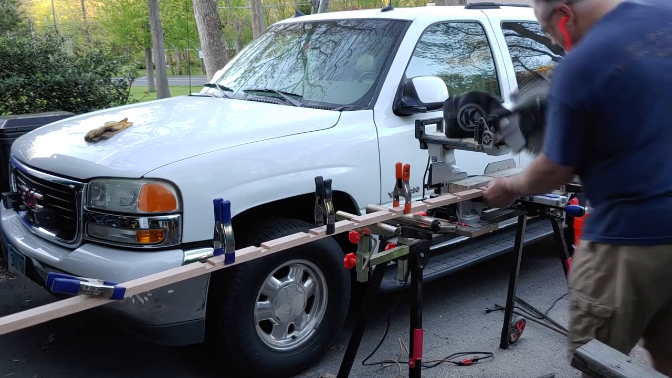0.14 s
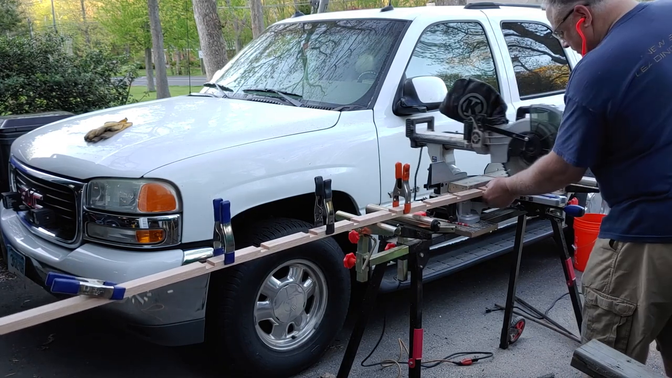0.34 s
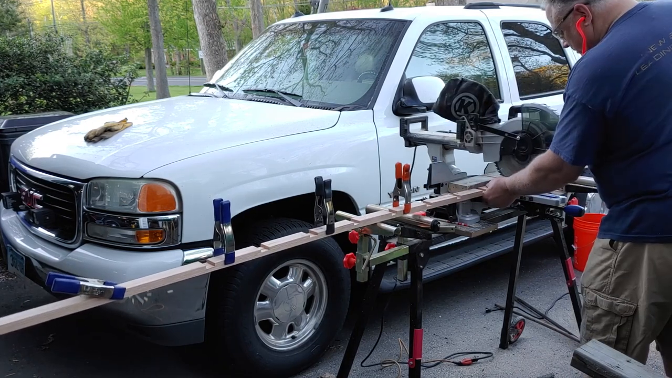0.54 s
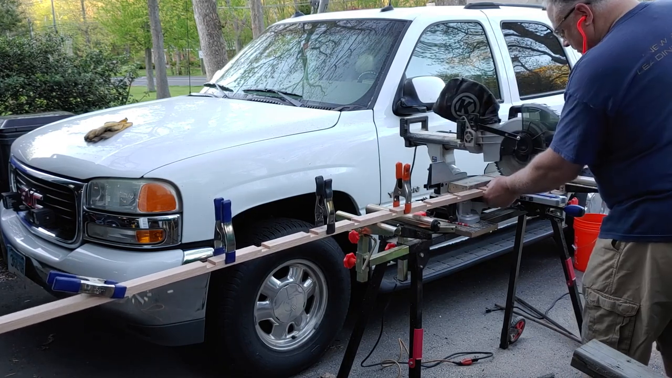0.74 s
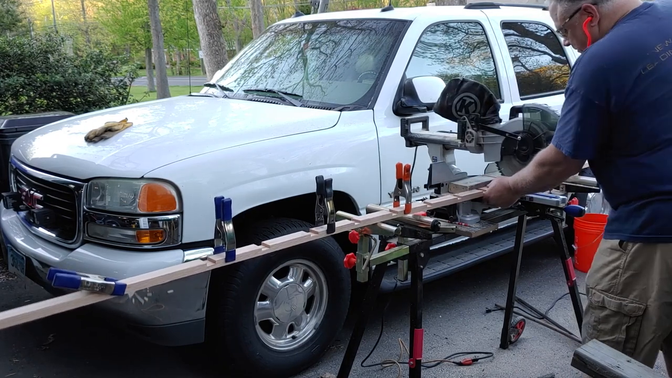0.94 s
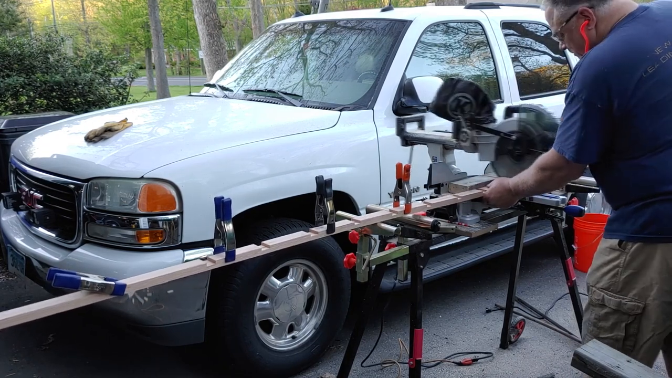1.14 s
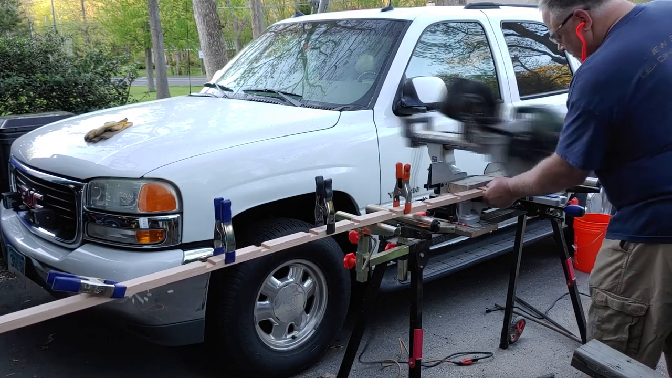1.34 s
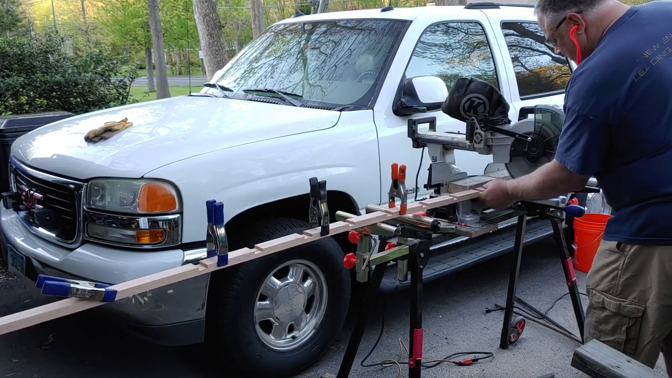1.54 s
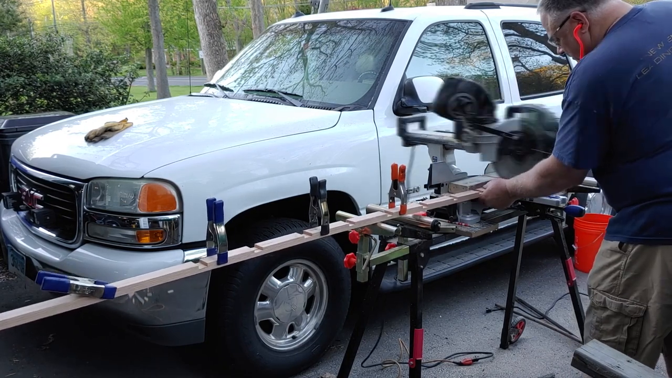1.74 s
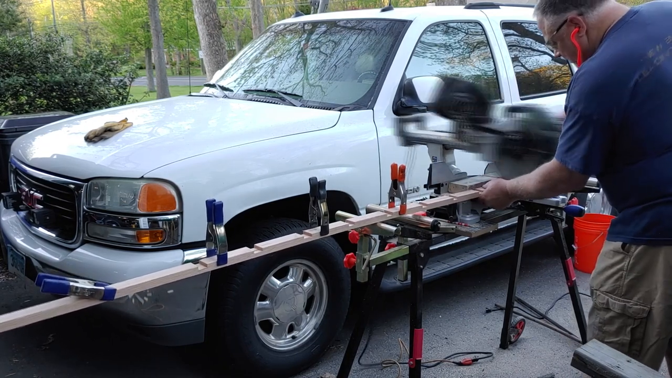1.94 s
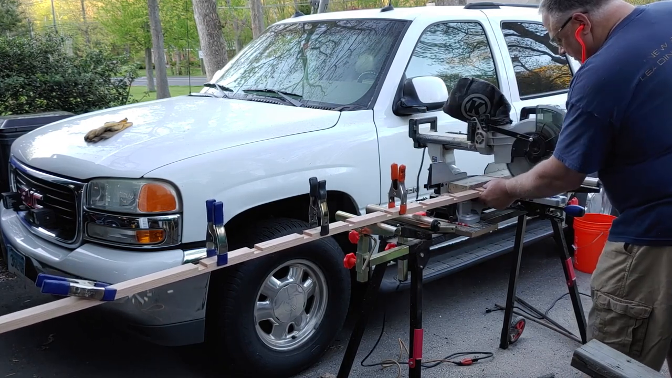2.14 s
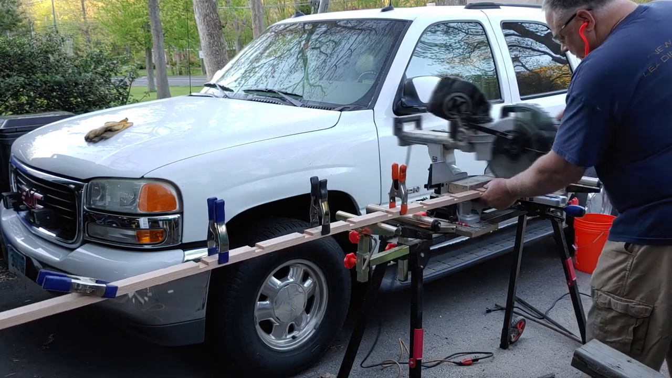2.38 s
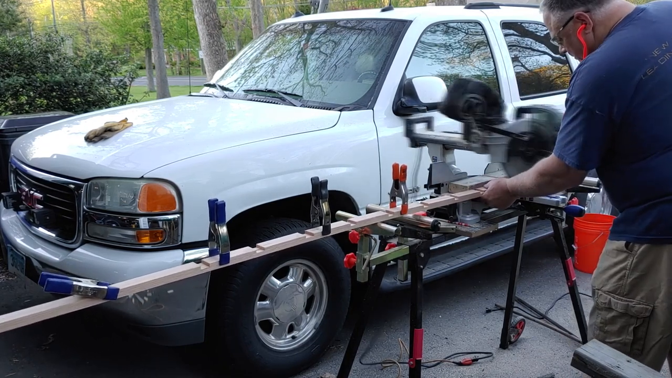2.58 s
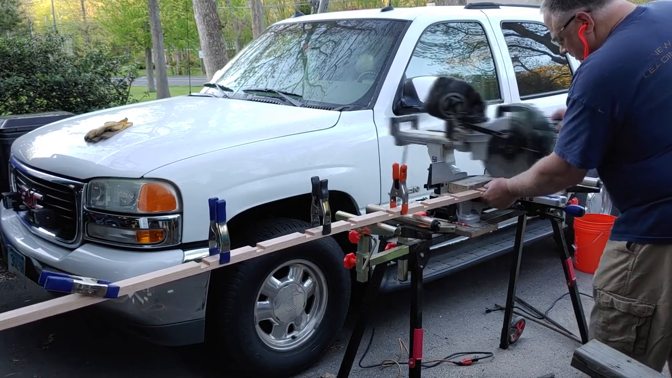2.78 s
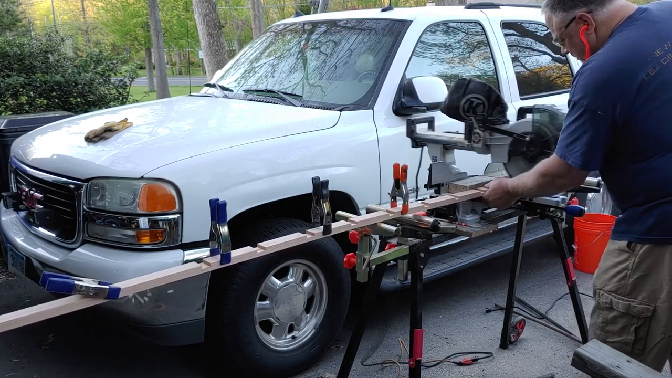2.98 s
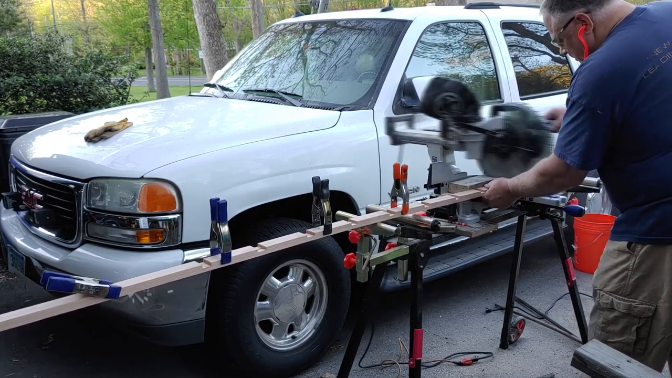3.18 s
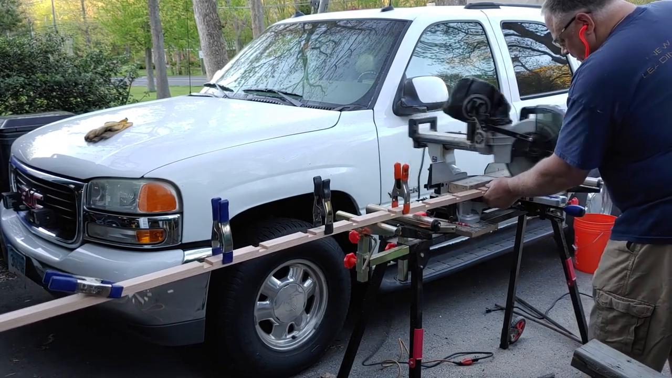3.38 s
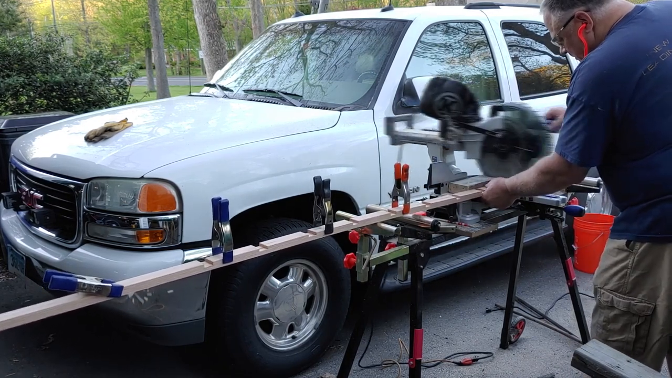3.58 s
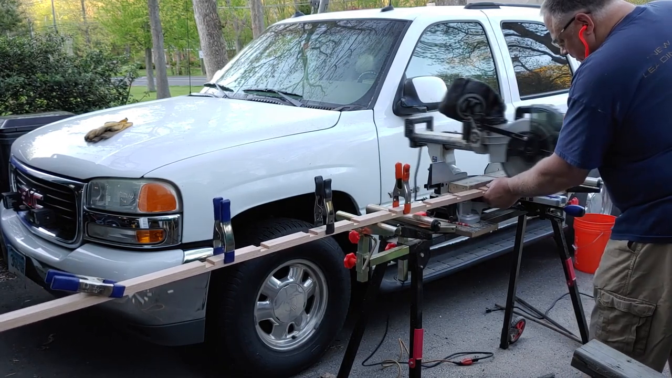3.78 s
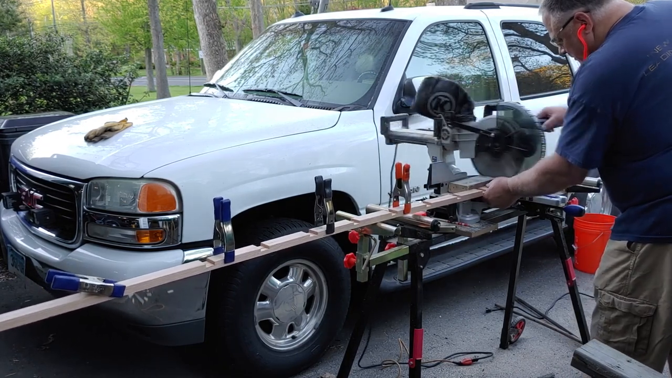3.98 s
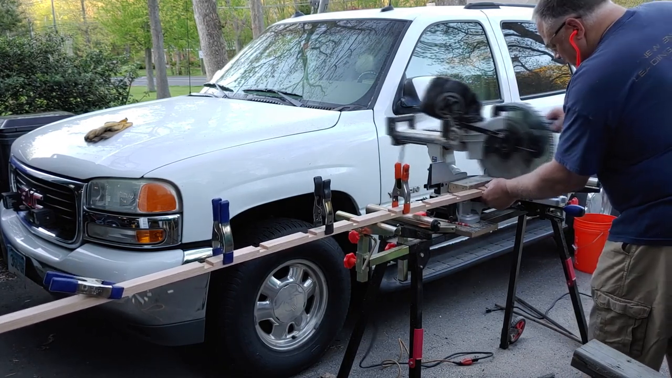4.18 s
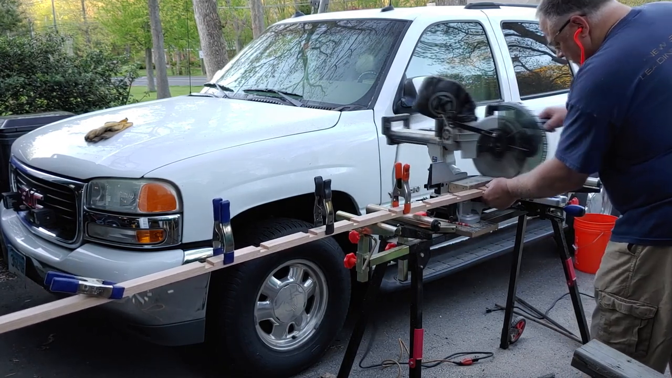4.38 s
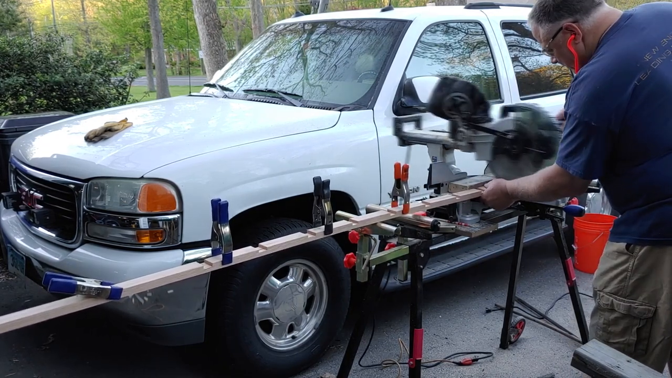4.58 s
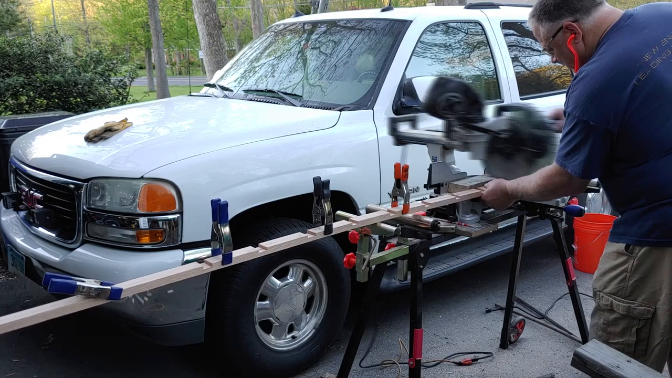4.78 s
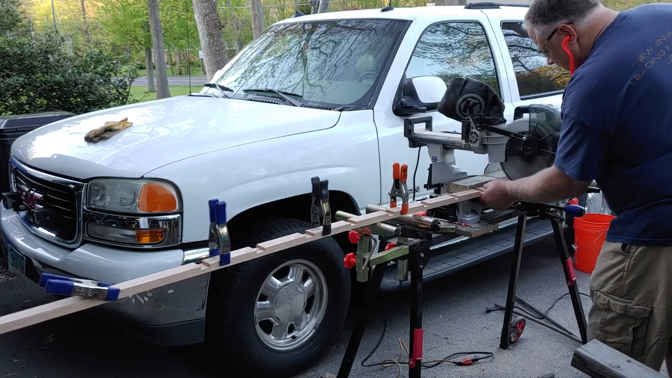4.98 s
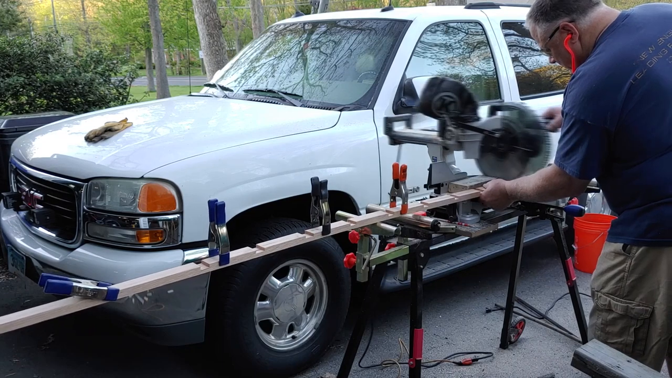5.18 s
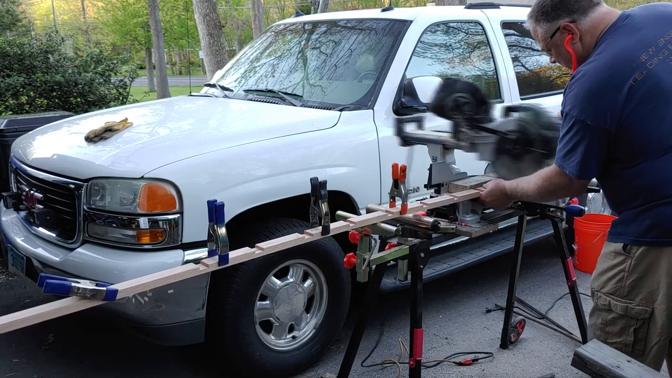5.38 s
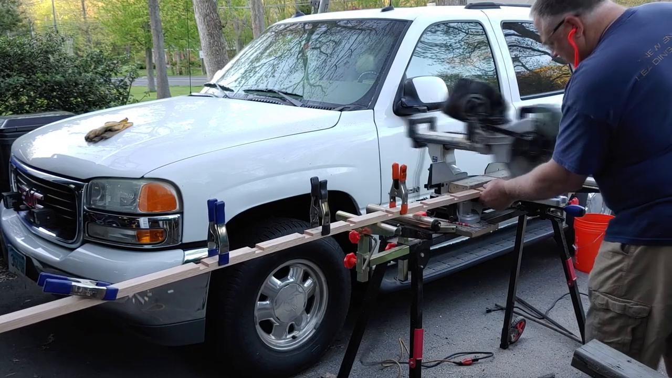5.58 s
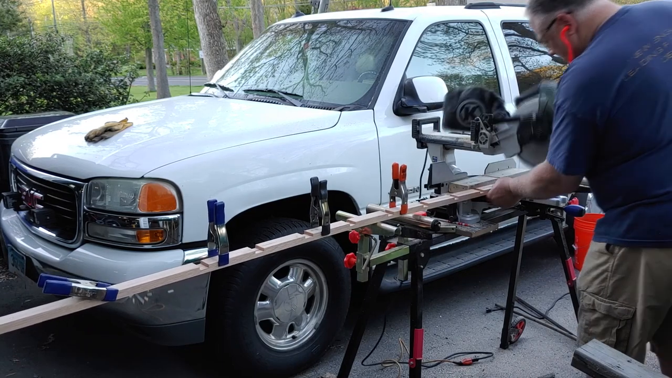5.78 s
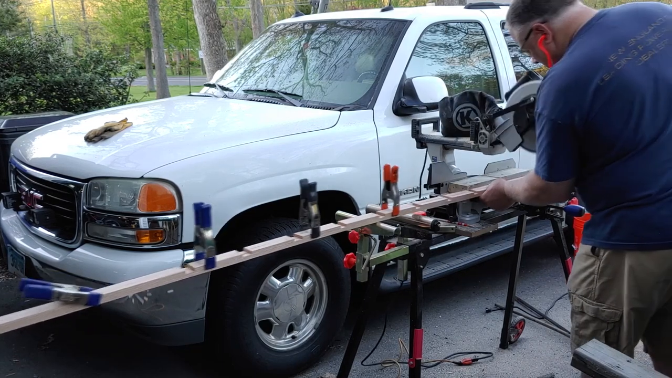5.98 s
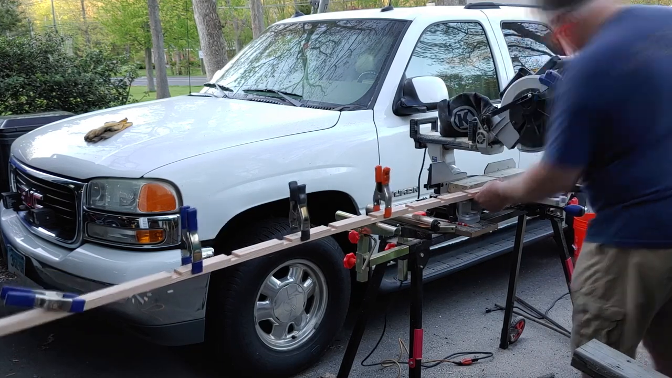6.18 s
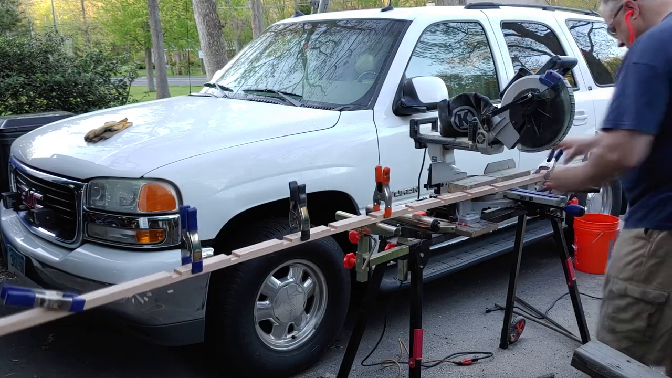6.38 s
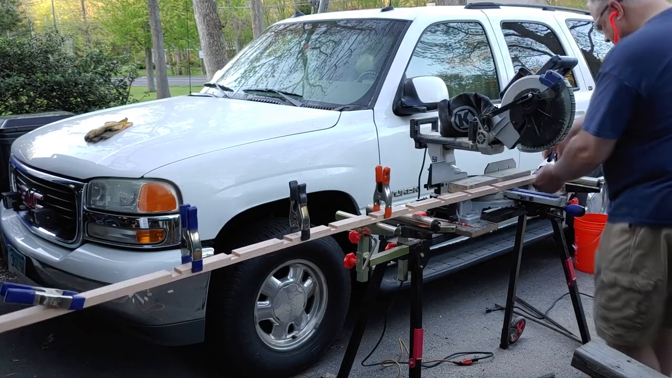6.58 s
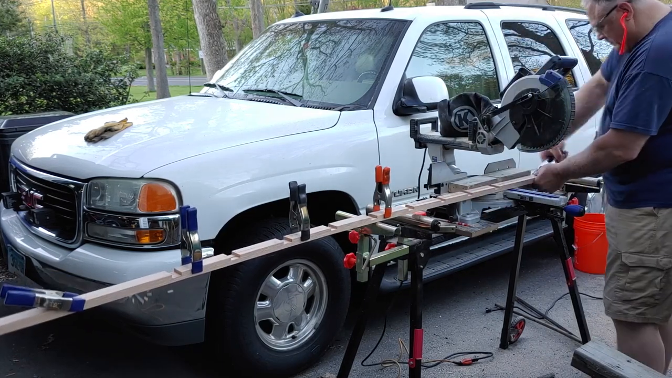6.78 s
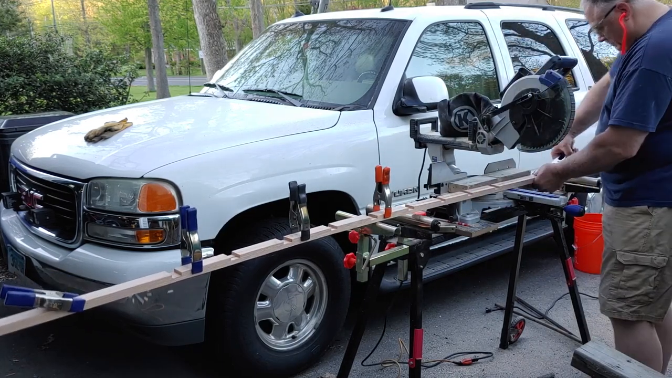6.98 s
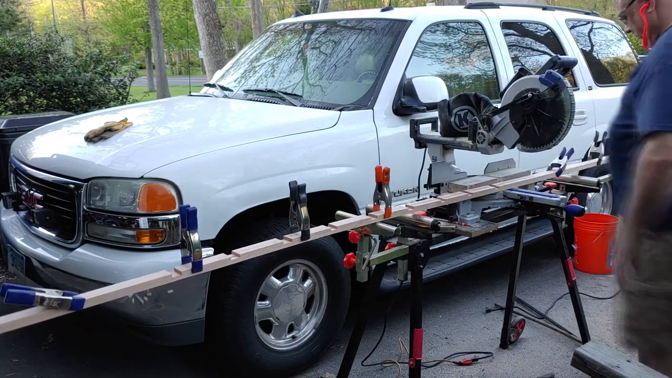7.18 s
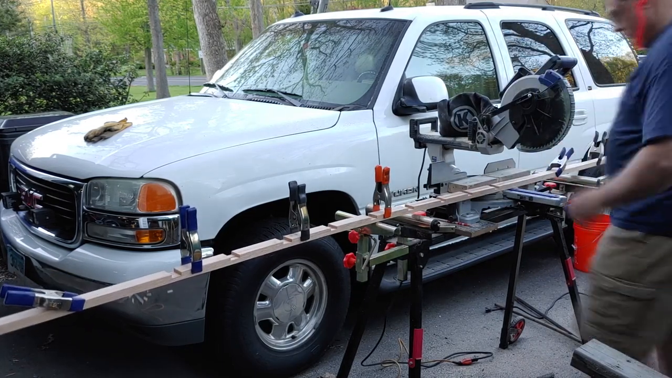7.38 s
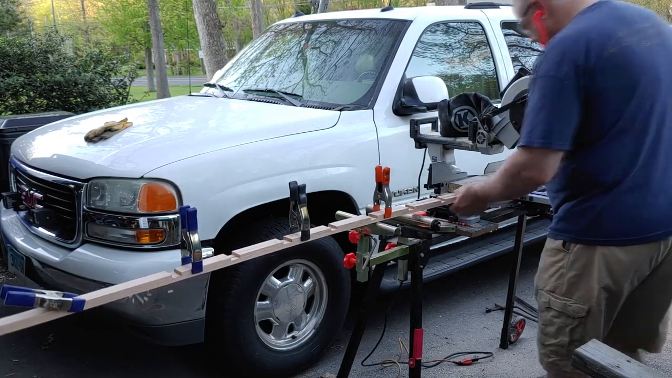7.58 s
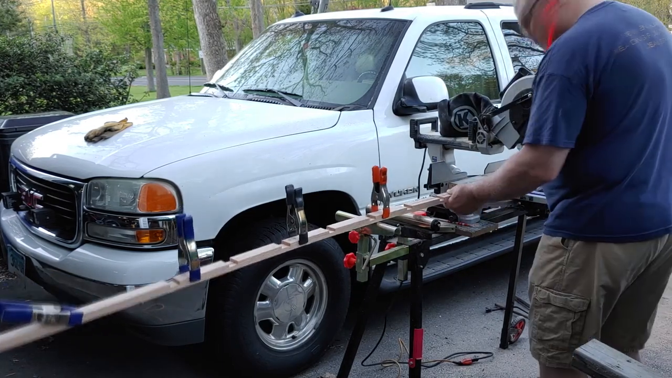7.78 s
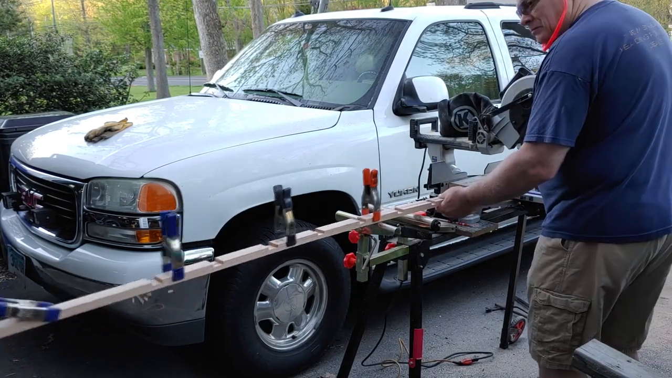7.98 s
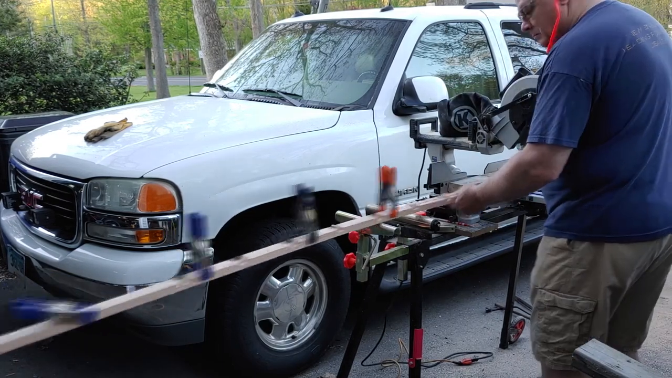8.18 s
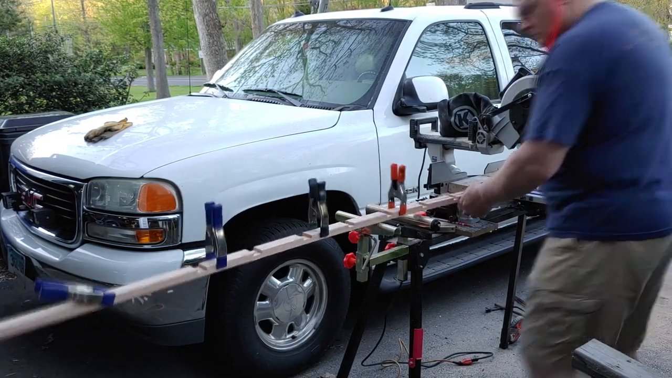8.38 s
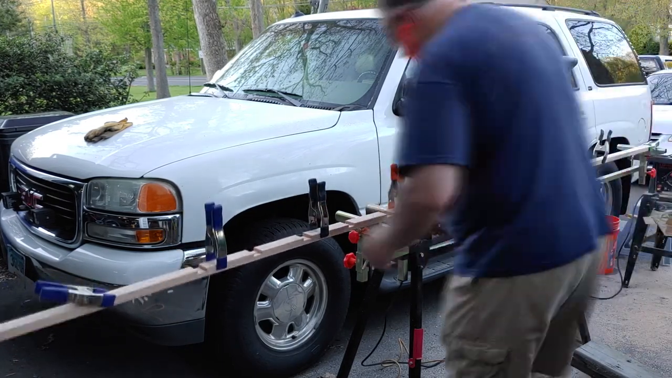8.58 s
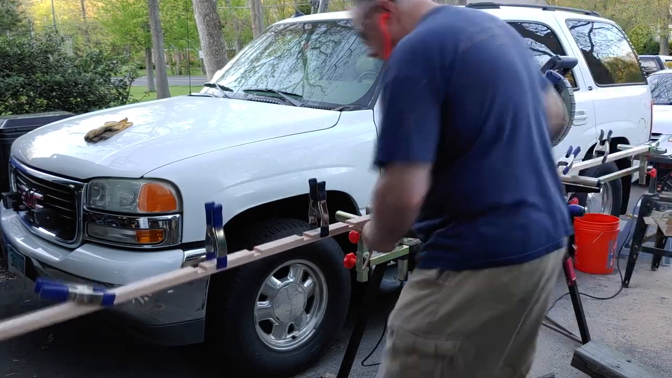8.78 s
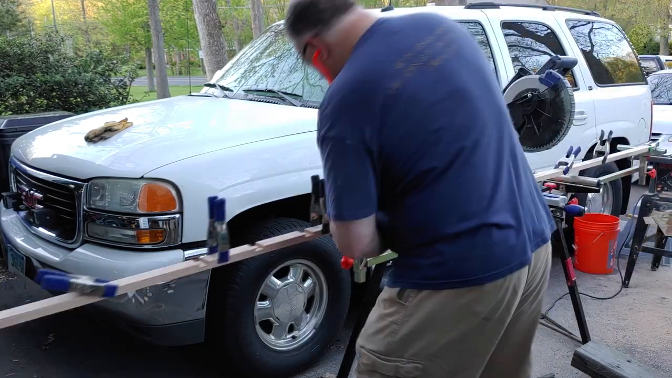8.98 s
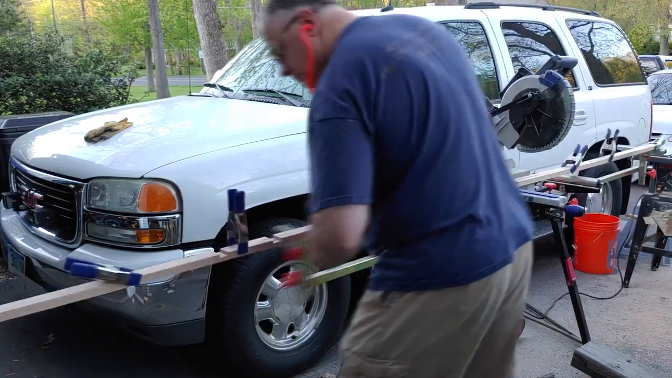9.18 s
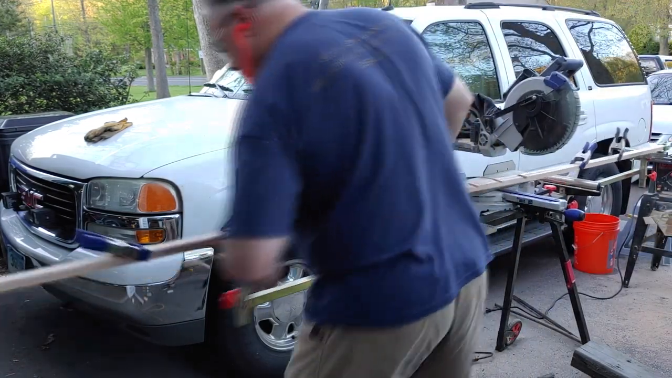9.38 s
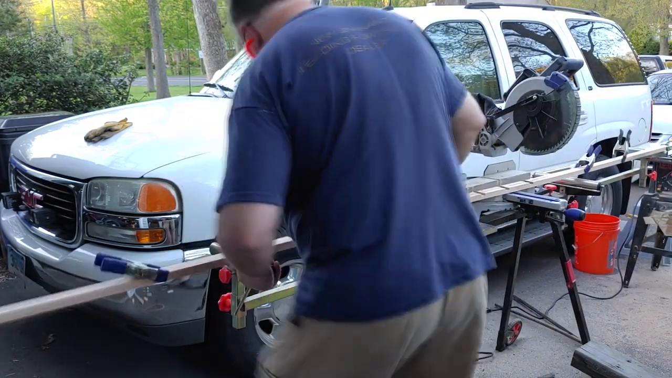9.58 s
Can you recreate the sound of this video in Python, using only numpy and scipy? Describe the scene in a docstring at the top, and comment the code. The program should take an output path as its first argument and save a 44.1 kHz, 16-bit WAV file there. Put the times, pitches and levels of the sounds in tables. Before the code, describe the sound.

Outdoors, a geared saw roars and rasps through a wood strip in repeated short bites, brakes to a ringing coast, and clamped wood clacks over a faint mower drone.

```python
"""On a driveway, a sliding miter saw starts with a clash of gears and nibbles through a clamped wood strip in ten bites.
Running free, its gears rattle as noise through blade resonances; in the wood they fall quieter and the strip rasps.
The brake whines down in falling tones, and the coasting blade rushes and rings from a tap each turn.
A mower drones far off in wavering partials; a shoe thumps, traffic whines and a bird ticks in short glides.
The strip knocks and slides along the fence as bursts of noise and ringing clicks, and a clamp squeaks."""
import sys
import numpy as np
from scipy import signal
from scipy.fft import rfft, irfft, next_fast_len
from scipy.io import wavfile

SR = 44100
rng = np.random.default_rng(int(sys.argv[2]) if len(sys.argv) > 2 else 0)


def store_wav(level_fs):
    """Save 16-bit WAV to argv[1]."""
    pcm = np.round(np.clip(np.atleast_2d(level_fs), -1, 1) * 32767)
    wavfile.write(sys.argv[1], SR, pcm.T.astype(np.int16))


N = 425104
TIME = np.arange(N) / SR
SIZE = next_fast_len(N)
FREQS = np.maximum(np.arange(SIZE // 2 + 1) * SR / SIZE, 1)
CUTOFF_HZ = 15830
SWITCH_ON_S, SWITCH_OFF_S, STOP_S = 1.086, 5.715, 6.47
MAINS_PULSE_HZ = 120   # twice the mains frequency


def from_db(db):
    """Turn decibels into gain."""
    return np.exp(np.asarray(db) * (np.log(10) / 20))


def in_time(rows):
    """Read each column of a curve at every sample."""
    s, *columns = np.transpose(rows)
    return [np.interp(TIME, s, column) for column in columns]


def at_hz(points):
    """Read a spectrum table at every frequency, along a logarithmic pitch scale."""
    hz, value = np.transpose(points)
    return np.interp(np.log(FREQS), np.log(hz), value)


def lift(modes, hz):
    """Power gain of a set of resonances: each raises the sound around its own pitch."""
    gain = 1
    for centre, width, db in modes:
        gain = gain + (from_db(db) ** 2 - 1) / (1 + (2 * (hz - centre) / width) ** 2)
    return gain


def drift(rate):
    """Slow chance: about `rate` random points a second, joined by lines."""
    knots = rng.standard_normal(4096)
    return np.interp(TIME * rate, np.arange(len(knots)), knots)


def step(at_s, rise_s):
    """A smooth change from 0 to 1."""
    return .5 + .5 * np.tanh((TIME - at_s) / rise_s)


def held(start_s, end_s, edge_s):
    """Attack, hold and release."""
    return step(start_s, edge_s) * (1 - step(end_s, edge_s))


def since(at_s):
    """Seconds gone by since a moment, 0 before it."""
    return np.maximum(TIME - at_s, 0)


def phase_of(hz):
    """Running angle of a rotation, in radians."""
    return 2 * np.pi * np.cumsum(hz) / SR


def tone(angle, db):
    """A sine of a given rms level."""
    return np.sqrt(2) * from_db(db) * np.sin(angle)


def ring(clicks, hz, width):
    """A resonance: a unit click sets a sine of height about 1 ringing."""
    r, w = np.exp(-np.pi * width / SR), 2 * np.pi * hz / SR
    return signal.lfilter([0, np.sin(w)], [1, -2 * r * np.cos(w), r * r], clicks + 1e-18)


# How much of the sound comes straight to the microphones: pitch_hz, share (0 to 1)
DIRECT_SHARE = [(60, 0.95), (700, 1), (1400, 0.93), (3000, 0.7), (7000, 0.21), (15000, 0.48)]


def noise(spectrum, modes=(), lag=1.25, band=slice(None), nearness=0.94):
    """Stereo noise through a body: a direct part, `lag` samples later on the left, plus scattered sound."""
    gain = from_db(at_hz(spectrum)) * np.sqrt(lift(modes, FREQS))
    share = np.clip(nearness * at_hz(DIRECT_SHARE), 0, 1)
    white = rfft(rng.standard_normal((3, SIZE)))
    delay = np.exp(-1j * np.pi * FREQS / SR * lag * np.array([[1], [-1]]))
    direct = np.sqrt(share) * white[0] * delay
    scattered = np.sqrt(1 - share) * white[1:]
    both = gain * (direct + scattered) * (FREQS < CUTOFF_HZ)
    # the mix of both sides gets rms 1 within the band
    power = np.sum(np.abs(both.mean(0)[band]) ** 2)
    return irfft(both, SIZE)[:, :N] * SIZE / np.sqrt(2 * power)


def placed(x, lag, scatter_db):
    """A tone arrives `lag` samples later on the left; part of its power comes as dying random echoes."""
    decay = np.exp(-TIME / 0.017)
    echoes = rng.standard_normal((2, N)) * decay / np.sqrt(np.sum(decay ** 2))
    direct = np.exp(-2j * np.pi * FREQS / SR * lag * np.array([[1], [0]]))
    scatter = from_db(scatter_db)
    heard = rfft(x, SIZE) * (direct + scatter * rfft(echoes, SIZE))
    return irfft(heard, SIZE)[:, :N] / np.hypot(1, scatter)


# Pace of the far mower's blade: time_s, passes_per_s (wavers slightly more by chance)
MOWER_RATE = [(0, 96.3), (.7, 95), (1.2, 94.6), (2.7, 95.3), (3.9, 96), (4.5, 97.4), (5.4, 95.4), (6.2, 95),
              (7.3, 96), (8.0, 95.2), (9.2, 96.5), (9.64, 95.7)]
# Fourth partial, which swells and fades over the distance: time_s, level_db (the 16th follows it)
MOWER_FOURTH = [(0, -80), (.7, -64.5), (1.15, -59), (1.3, -73), (1.65, -65), (2.6, -76.5), (3.7, -80),
                (3.95, -69), (4.7, -65), (5.15, -76), (5.4, -63), (7.2, -72), (7.7, -60.5), (8.2, -79),
                (9.64, -76)]
# Eighth partial, likewise: time_s, level_db
MOWER_EIGHTH = [(0, -71), (1.3, -71.5), (5.2, -69), (5.9, -60.5), (6.6, -68.5), (7.4, -62.5), (8.0, -76),
                (8.3, -66), (8.6, -79), (9.64, -67)]
# The other partials: multiple of the blade passes, middle level_db
MOWER_ORDERS = [(2, -89), (3, -87), (5, -71), (6, -72), (7, -79), (9, -77), (10, -87), (11, -86),
                (12, -80.5), (20, -90)]
# A second far hum: middle pitch_hz, middle level_db
FAR_HUM = [(237, -92.5), (356, -77.5), (609, -80)]
# Colour of the outdoor air: pitch_hz, relative level_db (per Hz)
AIR = [(30, -2), (110, -36), (180, -14), (300, -6), (450, 0.5), (800, 1), (1100, -8), (1500, -11.5),
       (3000, -13), (6000, -19), (12000, -23), (15500, -24)]


def mower():
    """Blade-pass partials fade in and out over the distance; the air chopped by the blade throbs with them."""
    angle = phase_of(in_time(MOWER_RATE)[0] * (1 + .001 * drift(12)))
    fourth_db, eighth_db = in_time(MOWER_FOURTH) + in_time(MOWER_EIGHTH)
    partials = [(4, fourth_db), (8, eighth_db), (16, fourth_db - 25)]
    partials += [(k, db + 3 * drift(3.3)) for k, db in MOWER_ORDERS]
    drone = 0
    for k, db in partials:
        # many paths through the trees make the phase wander between the sides
        wander = .5 * drift(3) * np.array([[1], [-1]])
        drone = drone + tone(k * angle + rng.uniform(0, 2 * np.pi) + wander, db)
    drone = drone * (1 + 0.17 * np.cos(phase_of(27.5 + drift(5.3))))   # firing of the engine
    hum = 0
    for hz, db in FAR_HUM:
        hum = hum + tone(phase_of(hz * (1 + .002 * drift(4))), db + 3 * drift(2))
    throb = (1 + 0.14 * np.cos(angle)) * from_db(0.37 * drift(3.9))
    air = from_db(-68.0) * noise(AIR, lag=3.36, nearness=1) * throb
    later_on_left = np.array([np.roll(drone[0], 3), drone[1]])
    return later_on_left + hum + air


# Colour of wood on metal: pitch_hz, relative level_db (per Hz)
CONTACT = [(300, -18), (1400, -3), (2400, 3.5), (4500, 1.5), (7000, 1), (11000, 1.5), (15500, 1)]
# Resonances of the fence: pitch_hz, width_hz, lift_db
FENCE_MODES = [(2360, 110, 3.3), (3220, 120, 1.3), (3740, 80, 2.3), (4290, 140, 1.5), (4870, 87, 1.9),
               (7200, 160, 2.6), (10420, 190, 2.2)]


def wood_on_metal():
    """Rough contact: noise coloured by the resonances of the fence."""
    return noise(CONTACT, FENCE_MODES, lag=1.0)


# Knocks of strip and clamps: start_s, peak level_db (8.5 dB is taken off all), decay_s,
# stressed pitch_hz, its lift_db
KNOCKS = [(0.194, -55, .009, 2300, 12), (0.291, -43, 0.0046, 3530, 14.5), (0.383, -53, 0.0078, 6900, 8),
          (6.5412, -55, .007, 3740, 2), (6.604, -62, .006, 3220, 8), (6.6784, -56.5, .007, 2360, 4),
          (6.795, -61, 0.045, 4800, 1), (7.2519, -60, 0.031, 4800, -1), (7.356, -56, 0.027, 3740, -2),
          (7.6011, -55, .0076, 4800, 2), (7.6799, -54, .0076, 2360, -1), (7.84, -62, .006, 2360, 13),
          (8.238, -63, .02, 3740, 8), (8.3491, -41, 0.0051, 6900, 9), (8.4058, -65, 0.035, 2360, 12),
          (8.689, -45, 0.01, 3220, -1), (8.8967, -55, .007, 3740, 1), (9.1058, -55, .009, 4820, 15),
          (9.1217, -41, 0.0067, 2350, 11.5), (9.2305, -57, .006, 3730, 19), (9.2579, -54, .012, 4920, 17),
          (9.276, -57, .012, 4290, 14), (9.3138, -52, 0.0059, 4290, 14), (9.3462, -56, 0.0076, 2250, 15),
          (9.447, -52, .009, 3770, 5), (9.4739, -50, .007, 4240, 9)]
KNOCK_Q = 12   # sharpness of the stressed pitch


def knocks(contact):
    """Each knock is a short crunch of contact noise that stresses one pitch."""
    blows = np.zeros((2, N))
    for s, db, decay_s, hz, ring_db in KNOCKS:
        span = slice(round(s * SR), round(s * SR) + SR // 4)
        age = TIME[span] - TIME[span][0]
        attack = 1 - np.exp(-age / 0.0016)
        fading = np.exp(-age / decay_s) + 0.13 * np.exp(-age / 0.021)
        crunch = contact[:, span] * attack * fading
        stressed = signal.lfilter(*signal.iirpeak(hz, KNOCK_Q, fs=SR), crunch)
        blows[:, span] += from_db(db - 8.5) * (crunch + (from_db(ring_db) - 1) * stressed)
    return blows


def footstep():
    """A shoe settles on the driveway: a dull thump of low noise that dies quickly."""
    age = since(0.68)
    thump = (1 - np.exp(-age / .003)) * np.exp(-age / .018)
    return from_db(-66) * thump * noise([(60, -11), (250, 0), (900, -25), (3000, -50)])


FULL_TURNS_PER_S, LEAP_SHARE, LEAP_S, CREEP_S = 377, .62, .009, .13
BRAKE_S, COAST_TURNS_PER_S = .1445, 13


def rotor_speed():
    """Turns per second: a leap and a creep up to full speed, then the brake pulls it down to a slow coast."""
    on = since(SWITCH_ON_S)
    leap_left = LEAP_SHARE * np.exp(-on / LEAP_S)
    creep_left = (1 - LEAP_SHARE) * np.exp(-on / CREEP_S)
    driven = FULL_TURNS_PER_S * (1 - leap_left - creep_left)
    return COAST_TURNS_PER_S + (driven - COAST_TURNS_PER_S) * np.exp(-since(SWITCH_OFF_S) / BRAKE_S)


# Blade in the wood: start_s, end_s, rasp level_db of the strip (7 dB is taken off all)
BITES = [(1.217, 1.429, -48.5), (1.832, 2.05, -46.5), (2.445, 2.657, -47.5), (2.82, 3.043, -46),
         (3.207, 3.43, -46), (3.58, 3.804, -48), (3.965, 4.185, -51), (4.228, 4.356, -49.5),
         (4.554, 4.699, -44), (5.193, 5.34, -48.5)]


def in_wood():
    """One 0-to-1 curve for each bite of the blade."""
    return [held(start, end, 0.013) for start, end, _ in BITES]


# reference level of the saw, from which its layers are set
FREE_DB, LOAD_DROP_DB = -35.5, 3.5
CLASH_DB, CLASH_HOLD_S, CLASH_FALL_DB_PER_S = -30.0, 0.023, 170
BRAKE_DROP_DB, COAST_FALL_DB_PER_S = 11.5, 14.5


def saw_level(load):
    """Level in dB: a clash, a roar that dips whenever the gears are taut, and a fall after switch-off."""
    # the gears also stay taut from the start to the end of the first bite
    taut = np.maximum(load, 1 - step(BITES[0][1], .015))
    off = since(SWITCH_OFF_S)
    braked = BRAKE_DROP_DB * (1 - np.exp(-off / BRAKE_S))
    roar = FREE_DB - LOAD_DROP_DB * taut - braked - COAST_FALL_DB_PER_S * off
    clash_db = CLASH_DB - CLASH_FALL_DB_PER_S * since(SWITCH_ON_S + CLASH_HOLD_S)
    return np.maximum(roar, clash_db)


def whirr(angle, order=4):
    """Fan blades and commutator repeat one irregular pattern each turn; the pattern slowly changes."""
    size, top = 2048, 42   # points in a turn, end of the partials
    out = 0
    for _ in range(order):
        partials = np.zeros(size // 2 + 1, complex)
        partials[6:top] = rng.standard_normal(top - 6) + 1j * rng.standard_normal(top - 6)
        turn = irfft(partials)
        place = (angle * size / (2 * np.pi)).astype(int) % size
        out = out + drift(7) * (turn / turn.std())[place]
    return out / np.sqrt(order)


# Buzz of the stalled motor: multiple of twice the mains frequency, level_db
STALL_BUZZ = [(4, -56.5), (8, -58.5), (12, -55), (16, -50), (20, -46), (24, -50), (27, -51), (31, -43)]
# Steady motor tones: multiple of the rotor speed, middle level_db relative to the saw level
MOTOR_ORDERS = [(4, -24.5), (32, -18)]
# Armature slots whining under the brake: multiple of the slot rate, start_s, end_s,
# level_db at switch-off (before the housing), fall_db_per_s
BRAKE_WHINE = [(1, 5.72, 6.125, -47, 15), (2, 5.765, 6.045, -41.5, 53)]
# How well the motor housing radiates the whine: pitch_hz, gain_db
HOUSING = [(1100, -12), (1300, -9), (1550, -3.5), (2000, -1), (2500, 0), (3050, -3), (3700, 14),
           (4150, -0.5), (4600, -13), (5200, -5), (5900, -14), (6800, 7), (7500, 4), (8500, 14), (9600, 3),
           (11300, 2), (13500, -12), (15500, 6)]
# Fan whistle at ten times the rotor speed: time_s, middle level_db
FAN_WHISTLE = [(1.4, -59), (2.2, -49.5), (2.9, -55), (4.3, -47.5), (5.7, -50.5)]


def motor_tones(angle, speed, saw_db, running):
    """A mains buzz at stall, steady orders at speed; the slot whine sweeps through the housing resonances."""
    mains = 2 * np.pi * MAINS_PULSE_HZ * TIME
    buzz = sum(tone(k * mains + 0.53 * drift(80), db) for k, db in STALL_BUZZ)
    buzz = buzz * (1 - step(1.18, 0.048))
    driven = running * (1 - step(SWITCH_OFF_S, .02))
    steady = driven * sum(tone(k * angle, saw_db + db + 2 * drift(5.98)) for k, db in MOTOR_ORDERS)
    steady = steady + running * from_db(saw_db - 11) * whirr(angle)
    # the slots also whine for a moment at the start
    surge = from_db(-50.0) * np.exp(-((TIME - 1.122) / 0.015) ** 2)
    slots = 32
    whine = 0
    for multiple, start, end, db, fall_db_per_s in BRAKE_WHINE:
        hz = multiple * slots * speed
        braking = from_db(db - fall_db_per_s * since(SWITCH_OFF_S)) * held(start, end, 0.0098)
        size = (braking + surge) * from_db(np.interp(hz, *np.transpose(HOUSING)))
        note = tone(multiple * slots * angle + .8 * drift(600), 2.6 * drift(260))
        whine = whine + size * (hz < CUTOFF_HZ) * note
    whistle_db = in_time(FAN_WHISTLE)[0] + 2 * drift(20)
    whistle = driven * tone(10 * angle + .5 * drift(50), whistle_db)
    body = placed(buzz + steady + whine, lag=1.2, scatter_db=-4)
    return body + placed(whistle, lag=1.2, scatter_db=-12)


# Colour of the gears clashing at the start: pitch_hz, relative level_db (per Hz)
CLASH = [(200, -38), (520, -14), (900, -27), (1300, -26), (1800, -7.5), (2600, 4), (3800, 1.5), (4600, -22),
         (8000, -12), (15500, -22)]
# Resonances of blade and guard when rattled: pitch_hz, width_hz, lift_db
RATTLE_MODES = [(1423, 28, 12.5), (1700, 56, 6.5), (1850, 180, 9), (2370, 90, 0), (2640, 67, 5.5),
                (3480, 190, 3.5), (3690, 110, 1.5), (3920, 73, 3), (4170, 135, 5), (5160, 170, 5.5),
                (5970, 67, 2), (6620, 520, 4), (11300, 580, 3.5), (1188, 25, 14.5)]
# Resonances of the coasting blade; the first also colours the clash: pitch_hz, width_hz, lift_db
BLADE_MODES = [(1730, 80, 7), (2710, 75, 14), (3740, 170, 10.5), (5060, 60, 8), (5290, 60, 8),
               (9750, 200, 5), (11700, 250, 8)]


def gear_clash(mids):
    """Gears clash as noise; the starting torque pulses at twice the mains frequency."""
    pulse = np.cos(2 * np.pi * MAINS_PULSE_HZ * TIME)
    return noise(CLASH, BLADE_MODES[:1] + RATTLE_MODES[2:7], band=mids) * (1 + 0.23 * pulse)


# Colour of the saw running free: pitch_hz, relative level_db (per Hz)
FREE = [(60, -25), (180, -35.5), (700, -16.5), (1050, -10.5), (1300, -11), (1600, -8), (2500, 3), (3800, 1),
        (4700, -0.5), (6800, -1), (8000, -2), (10300, -1.5), (11800, 1), (15500, 2)]


def gear_rattle(angle, mids):
    """Loose teeth knock unevenly, about once a turn, and set blade and guard ringing."""
    knocking = 1 + 0.076 * np.cos(angle + 0.64 * drift(200))
    return noise(FREE, RATTLE_MODES, band=mids) * knocking * from_db(0.38 * drift(90))


# Colour of the saw in the wood: pitch_hz, relative level_db (per Hz)
BITING = [(60, -32.5), (180, -33), (700, -23.5), (1200, -11), (1700, -5), (3000, -1.5), (3800, 0),
          (4600, -2), (6000, -4.5), (7000, -2.5), (8000, -4), (10000, -1.5), (12000, -3), (15500, -0.5)]


def blade_biting(mids):
    """In the wood the saw is an uneven noise with a single rattle resonance."""
    return noise(BITING, RATTLE_MODES[6:7], band=mids) * from_db(0.62 * drift(120))


def strip_rasp(bites):
    """The strip is a dull soundboard for the teeth that tear it."""
    board = [(40, -32.0), (120, -20.5), (250, -10.5), (600, 1.0), (1000, 3.0), (1600, -1.5), (4000, -39)]
    wood = noise(board, nearness=0.13) * from_db(1.0 * drift(40))
    return wood * sum(bite * from_db(row[2] - 7.0) for bite, row in zip(bites, BITES))


# Colour of the zing: pitch_hz, relative level_db (per Hz)
ZING = [(2000, -25), (4500, -8), (7000, -3), (12000, -1), (15500, -1)]
ZING_DB, ZING_S = -4.5, 0.052   # relative to the free rattle, decay


def exit_zing():
    """The teeth zing as the blade leaves the wood: a bright burst of noise that dies away."""
    bursts = sum(step(end, .006) * np.exp(-since(end) / ZING_S) for _, end, _ in BITES)
    return noise(ZING) * bursts * from_db(ZING_DB)


SHIMMER_WIDTH_HZ, SHIMMER_DB, SHIMMER_PER_S = 85, 2.2, 48


def shimmer(x, count=10):
    """The blade's crowded modes trade energy: narrow bands, dealt into groups, flare and fade on their own."""
    group = rng.integers(0, count, SR)[(FREQS / SHIMMER_WIDTH_HZ).astype(int)]
    spectrum = rfft(x, SIZE)
    gains = [from_db(SHIMMER_DB * drift(SHIMMER_PER_S)) for _ in range(count)]
    out = sum(gain * irfft(spectrum * (group == k), SIZE)[:, :N] for k, gain in enumerate(gains))
    return out / np.sqrt(sum(gain ** 2 for gain in gains) / count)


# Echoes of the moving head: middle delay_s, change of delay_s, gain relative to the direct sound
HEAD_ECHOES = [(.0013, .00005, .22), (.0047, .00005, .3)]


def moving_head(x):
    """The head slides to and fro, so the echoes from table and truck comb the sound at shifting pitches."""
    out, power, samples = x.copy(), 1, np.arange(N)
    for delay_s, travel_s, size in HEAD_ECHOES:
        at = samples - SR * (delay_s + travel_s * drift(5))
        out += size * np.array([np.interp(np.round(at), samples, side) for side in x])
        power += size ** 2
    return out / np.sqrt(power)


# Tones of the blade plate: middle pitch_hz, level_db running free, level_db in the wood
# (3.5 dB is taken off both, and chance moves them)
BLADE_TONES = [(1498, -63, -68), (2397, -57, -65), (2874, -55, -64), (3265, -52.5, -59), (3980, -57, -56),
               (5370, -59, -60), (7140, -59, -56), (8812, -61, -58), (11330, -55, -66), (12025, -49, -60),
               (12890, -56, -61), (13950, -55, -60), (14125, -55, -58), (14988, -56, -62)]
# Its loudest squeals, and brief flares of the fan whistle at ten times the rotor speed (the rows at 3400 to
# 3761 Hz): # middle time_s, pitch_hz, level_db, swell_s, glide_hz_per_s
SQUEALS = [(1.255, 3400, -42, .03, 1500), (1.32, 3505, -48, .045, 600), (1.44, 5340, -44, .03, 0),
           (1.45, 7130, -45, .03, 600), (2.05, 5196, -41, .03, 0), (2.65, 9532, -44, .03, 0),
           (3.825, 12891, -43, .025, 0), (4.0, 6750, -44, .03, -1200), (4.14, 9532, -43, .03, 0),
           (4.22, 3761, -42, .02, 0), (4.0, 3990, -45, .025, -1500), (4.58, 3761, -38, .03, -1100),
           (5.26, 3761, -43, .03, -900)]


def blade_song(running, load):
    """Plate modes of the blade swell and fade by chance, and squeal in short glides when the kerf rubs them;
    the fan whistle flares and glides in the same way."""
    song = np.zeros(N)
    for hz, free_db, wood_db in BLADE_TONES:
        swell_db = 5.0 * np.minimum(drift(14), 1.5)
        level_db = free_db + load * (wood_db - free_db) - 3.5 + swell_db
        song += tone(phase_of(hz + 14 * drift(60) + 12 * drift(9)), level_db)
    song *= running
    waver = phase_of(10 * drift(82))
    for s, hz, db, swell_s, glide_hz_per_s in SQUEALS:
        near = np.abs(TIME - s) < 3 * swell_s
        t = TIME[near] - s
        glide = phase_of(hz + glide_hz_per_s * t)
        song[near] += tone(glide + waver[near], db) * np.exp(-(t / swell_s) ** 2)
    return placed(song, lag=1.2, scatter_db=-4)


# Colour of the coasting rush: pitch_hz, relative level_db (per Hz)
COASTING = [(400, -44), (1300, -12.5), (1800, -6), (2300, -11), (3100, -17), (3700, -10.5), (4500, -17.5),
            (6000, -17.5), (9800, -14), (13000, -22.5), (15500, -17)]
# Blade modes that the taps ring: pitch_hz, width_hz, relative level_db
TAPPED_MODES = [(1725, 42, -5), (2710, 40, -9), (3760, 50, 0), (3640, 60, -7), (5270, 50, -18)]
RUSH_DB, RUSH_TREBLE_DB, RUSH_TREBLE_FALL_DB_PER_S, RUSH_SPLIT_HZ = -1.5, 9.5, 22.5, 6500
TAP_DB, TAP_SPREAD_DB = -3.5, 3.0


def coast(angle, mids):
    """A rush whose treble dies faster, and a tap of the slack gear each turn that makes the modes flutter."""
    rush = noise(COASTING, BLADE_MODES, band=mids) * from_db(RUSH_DB + 1.4 * drift(46))
    dull = signal.sosfilt(signal.butter(4, RUSH_SPLIT_HZ, fs=SR, output="sos"), rush)
    bright = signal.sosfilt(signal.butter(4, RUSH_SPLIT_HZ, "high", fs=SR, output="sos"), rush)
    treble_db = RUSH_TREBLE_DB - RUSH_TREBLE_FALL_DB_PER_S * since(SWITCH_OFF_S)
    rush = dull + bright * from_db(treble_db)
    taps = np.diff(angle // (2 * np.pi), prepend=0)   # 1 at each full turn
    rings = 0
    for hz, width, db in TAPPED_MODES:
        strength = from_db(db + TAP_SPREAD_DB * rng.standard_normal(N))
        rings = rings + ring(np.gradient(taps * strength), hz, width)
    # rms 1 over the slow part of the coast
    slow = (TIME > BRAKE_WHINE[0][2]) & (TIME < STOP_S)
    rings = rings / np.sqrt(np.mean(rings[slow] ** 2)) * step(5.99, .04)
    return rush + from_db(TAP_DB) * placed(rings, lag=1.2, scatter_db=-8)


STOP_FADE_S = 0.082
GRIT_DB, GRIT_PER_S = 1.3, 520   # depth and pace of the gear teeth's grit


def saw():
    """Load takes up the slack in the gears, slows the motor and drives the strip."""
    bites = in_wood()
    load = np.clip(sum(bites), 0, 1)
    late_load = signal.lfilter([.0003], [1, .0003 - 1], load)   # the speed gives way gradually
    speed = rotor_speed() * (1 - .006 * late_load + .001 * drift(40))
    angle = phase_of(speed)
    saw_db = saw_level(load)
    audible = step(SWITCH_ON_S, 0.00089) * (1 - step(STOP_S, STOP_FADE_S))
    starting, coasting = 1 - step(1.167, 0.038), step(5.84, 0.064)
    running = (1 - starting) * (1 - coasting)
    mids = (FREQS > 1400) & (FREQS < 6000)
    # square roots blend the noises by power
    gears = np.sqrt(1 - load) * gear_rattle(angle, mids) + np.sqrt(load) * blade_biting(mids)
    grit = from_db(GRIT_DB * drift(GRIT_PER_S))
    blade = np.sqrt(starting) * gear_clash(mids) + np.sqrt(running) * grit * (gears + exit_zing())
    roar = moving_head(shimmer(blade)) + np.sqrt(coasting) * coast(angle, mids)
    tones = motor_tones(angle, speed, saw_db, running) + blade_song(running, load)
    return audible * (from_db(saw_db - 1.85) * roar + tones) + strip_rasp(bites)


# Chips of a small bird high in the trees: middle time_s, start_hz, end_hz, level_db
CHIPS = [(7.073, 15450, 12500, -68), (7.127, 15500, 12500, -64), (7.3, 9600, 11600, -69),
         (7.42, 9200, 11300, -68), (8.89, 12000, 9000, -66)]


def bird():
    """Each chip is one quick, thin glide that swells and fades."""
    out = np.zeros(N)
    part = np.linspace(0, 1, round(.016 * SR))
    for s, start_hz, end_hz, db in CHIPS:
        first = round(s * SR) - len(part) // 2
        glide = phase_of(start_hz + (end_hz - start_hz) * part)
        out[first:first + len(part)] += tone(glide, db) * np.sin(np.pi * part)
    return placed(out, lag=0, scatter_db=4)


# Far traffic gathering speed: time_s, middle pitch_hz, middle level_db
TRAFFIC_WHINE = [(8.6, 385, -90), (8.75, 435, -72), (8.9, 530, -76), (9.06, 650, -73), (9.21, 725, -71),
                 (9.36, 760, -72), (9.64, 775, -82)]


def traffic():
    """A faint, blurred whine climbs far away: a rising tone whose pitch and level waver."""
    hz, db = in_time(TRAFFIC_WHINE)
    whine = tone(phase_of(hz + 12 * drift(60)), db + 2 * drift(25))
    return placed(whine * step(TRAFFIC_WHINE[0][0], .03), lag=3, scatter_db=-4)


# Pushes of the strip along the fence: start_s, end_s, level_db as it starts (grain moves it)
PUSHES = [(9.114, 9.22, -60), (9.232, 9.395, -61.5), (9.444, 9.534, -65)]
PUSH_EDGE_S, PUSH_FALL_DB_PER_S = 0.019, 42
CATCHES_PER_S, CATCH_DB = 480, 3   # pace, strength relative to the push


def strip_slide(contact):
    """Sliding is grainy contact noise and a run of small catches that set the metal ringing."""
    slide = 0
    for start, end, db in PUSHES:
        slide = slide + held(start, end, PUSH_EDGE_S) * from_db(db - PUSH_FALL_DB_PER_S * since(start))
    caught = rng.random(N) < CATCHES_PER_S / SR
    catches = slide * caught * from_db(CATCH_DB) * rng.standard_normal(N)
    dealt = rng.integers(0, len(FENCE_MODES), N)   # each catch rings one resonance
    rings = sum(ring(catches * (dealt == k), hz, width) for k, (hz, width, _) in enumerate(FENCE_MODES))
    grain = from_db(3.6 * drift(260) - 2)
    return slide * grain * contact + placed(rings, lag=0, scatter_db=-2)


# Squeaks of a clamp on the fence: middle time_s, pitch_hz, level_db, swell_s
CLAMP_SQUEAKS = [(9.213, 7330, -70, .011), (9.28, 10300, -66, .007), (9.483, 10500, -70, .012)]


def squeaks():
    """Metal sticks for a moment and sings one thin note, a sine that swells and fades."""
    notes = 0
    for s, hz, db, swell_s in CLAMP_SQUEAKS:
        notes = notes + tone(2 * np.pi * hz * TIME, db) * np.exp(-((TIME - s) / swell_s) ** 2)
    return placed(notes, lag=0, scatter_db=-4)


def scene():
    """The far mower, strip and clamps, a footstep, the saw, a bird and traffic."""
    contact = wood_on_metal()
    handling = knocks(contact) + strip_slide(contact) + squeaks()
    return mower() + handling + footstep() + saw() + bird() + traffic()


def record(dry):
    """The deep bass rolls off and the top is cut steeply."""
    passed = 1 / np.sqrt((1 + (FREQS / CUTOFF_HZ) ** 400) * (1 + (40 / FREQS) ** 4))
    return irfft(rfft(dry, SIZE) * passed, SIZE)[:, :N]


dry = scene()
out = record(dry)
store_wav(out)
```